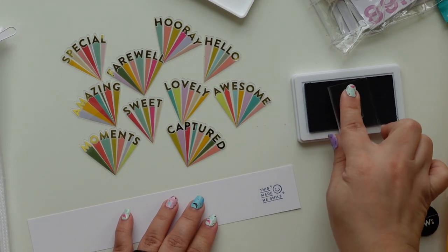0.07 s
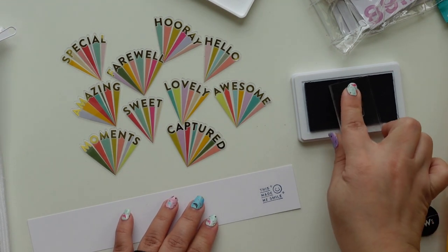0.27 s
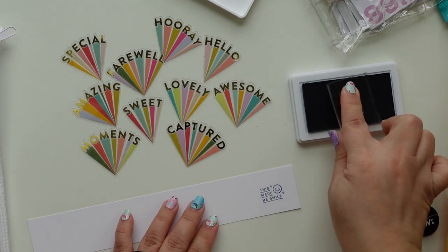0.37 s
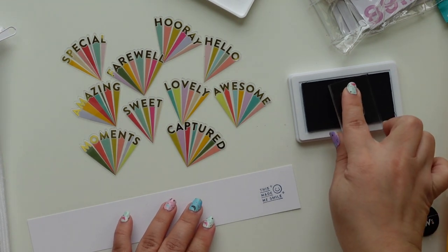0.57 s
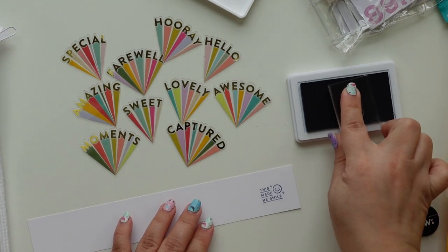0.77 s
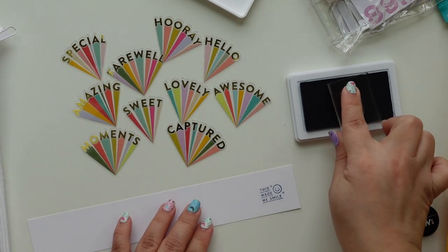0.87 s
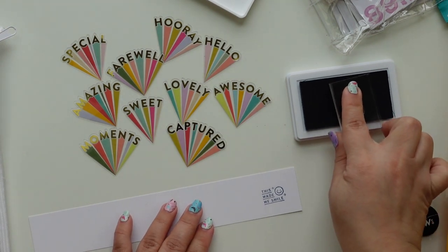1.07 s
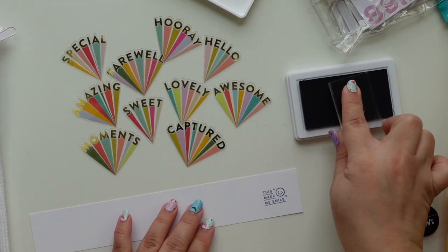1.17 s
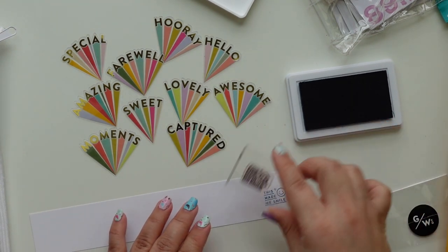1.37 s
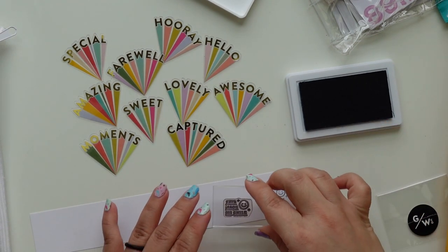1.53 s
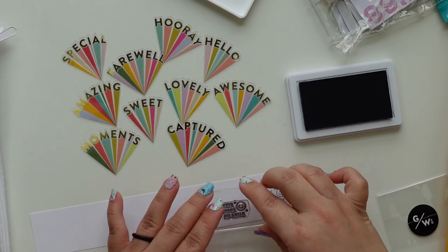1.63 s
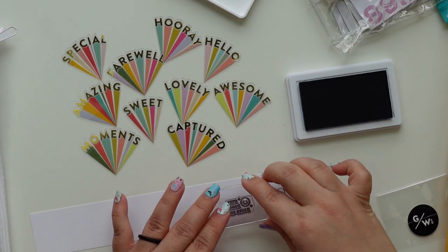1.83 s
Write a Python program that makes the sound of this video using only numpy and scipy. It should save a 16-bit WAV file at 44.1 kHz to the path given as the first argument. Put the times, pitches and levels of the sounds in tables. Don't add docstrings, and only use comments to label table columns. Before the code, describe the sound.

A hard plastic stamp block taps an ink pad on a table, six knocks in steady, slightly quickening succession, the fourth-to-last weak and dull, then near quiet; close stereo microphone in a small room, with faint hiss.

```python
import sys
import numpy as np
from scipy import signal
from scipy.fft import rfft, irfft
from scipy.io import wavfile

SR = 44100
rng = np.random.default_rng(int(sys.argv[2]) if len(sys.argv) > 2 else 0)


def volts(x):
    e = np.asarray(x, float) / 20
    return 10 ** e


def bounce(signal):
    frames = np.transpose(np.atleast_2d(signal))
    limited = np.clip(frames, -1, 1)
    pcm = np.round(limited * 32767).astype(np.int16)
    wavfile.write(sys.argv[1], SR, pcm)


N = 83790


def add(mix, start_s, sound):
    at = round(start_s * SR)
    sound = sound[..., max(-at, 0):]
    part = mix[..., max(at, 0):][..., :sound.shape[-1]]
    part += sound[..., :part.shape[-1]]


def ring(modes, crest_s, t):
    out = 0
    for pitch_hz, level_db, t60_s in modes:
        out = out + volts(level_db - 60 * t / t60_s) * np.cos(2 * np.pi * pitch_hz * (t - crest_s))
    return out


# pitch_hz, level_db, t60_s
TABLE = [(76, -36, .5), (131, -10, .2), (150, -12, .21), (205, -8, .16), (609, -9, .06)]
# pitch_hz, level_db, t60_s
TRAY = [(261, -20, .24), (279, -21, .24), (308, -15, .22), (370, -26, .16), (430, -15, .1),
        (468, -13, .065), (545, -19, .12), (715, -17, .12)]
TABLE_CREST_S, TRAY_CREST_S, SWELL_S = .0091, .0068, .002
PUSH_HZ, PUSH_TURNS, PUSH_SKEW = 262, 1.6, .75
PUSH_START_S, PUSH_DB = .0004, -3


def thump(level_db):
    t = np.arange(round(PUSH_TURNS / PUSH_HZ * SR)) / SR
    shape = np.sin(np.pi * (t * PUSH_HZ / PUSH_TURNS) ** PUSH_SKEW)
    push = -shape * np.sin(2 * np.pi * PUSH_HZ * t)
    t = np.arange(SR // 2) / SR
    out = ring(TABLE, TABLE_CREST_S, t) + ring(TRAY, TRAY_CREST_S, t)
    out = out * np.minimum(t / SWELL_S, 1) ** 2
    add(out, PUSH_START_S, volts(PUSH_DB) * push)
    return volts(level_db) * out


# pitch_hz, level_db
BLOCK = [(1080, -42), (1290, -44), (1550, 8.5), (1790, 8.5), (2000, 4), (2440, 6), (2950, -1.5),
         (3350, -7.5), (3900, -9), (4700, -11.5), (5500, -51), (6600, -13), (8500, -16), (11000, -32)]
# delay_s, level_db
CONTACTS = [(.0007, -23), (.0020, -15), (.0031, -8), (.0041, -3), (.0060, 0), (.0087, -5), (.0112, -8)]
BLOCK_T60_S, BODY_HZ, SOFT_HZ = .0115, 1050, 4800
CHATTER_DB, CHATTER_S = -17, .004
CONTACT_SPREAD_DB, WIDTH = 1.5, .25


def rattle(level_db, hardness_db):
    t = np.arange(1024) / SR
    luck = rng.standard_normal((len(CONTACTS), 2))
    noise = rng.standard_normal((3, 1024))
    chatter = volts(CHATTER_DB) * noise * (t / CHATTER_S) * np.exp(1 - t / CHATTER_S)
    blows = 0.39 * chatter[0]
    for (delay_s, contact_db), (force, timing) in zip(CONTACTS, luck):
        add(blows, delay_s + .0001 * timing, -volts([contact_db + CONTACT_SPREAD_DB * force]))
    body = np.zeros(1024)
    for pitch_hz, mode_db in BLOCK:
        loss_db = 60 * t / BLOCK_T60_S * np.sqrt(pitch_hz / 1500)
        body += volts(mode_db - loss_db) * np.sin(2 * np.pi * pitch_hz * t)
    band = signal.butter(2, [BODY_HZ, SOFT_HZ * volts(hardness_db)], "band", fs=SR, output="sos")
    struck = signal.fftconvolve(blows + WIDTH * chatter[1:], body[None], axes=1)
    return volts(level_db - 14) * signal.sosfilt(band, struck)


def read(points, hz):
    f, value = np.transpose(points)
    return np.interp(np.log(hz + 1), np.log(f + 1), value)


# pitch_hz, t60_s
ROOM = [(100, 0.1), (260, 0.44), (700, 0.58), (1800, 0.39), (4800, 0.67), (12000, 0.45)]
# pitch_hz, likeness (0 to 1)
ROOM_SAME = [(250, .99), (600, .78), (5000, .82)]
ROOM_START_S = .01


def room(x):
    length = SR // 2
    echoes = np.zeros((3, length))
    at = np.arange(0, length - 10, 10) + rng.integers(0, 10, (3, (length - 1) // 10))
    np.put_along_axis(echoes, at, rng.choice([-1., 1.], at.shape), 1)
    hz, t, z = signal.stft(echoes, SR, nperseg=256)
    same = np.clip(read(ROOM_SAME, hz), 0, 1)[:, None]
    z = same * z[0] + np.sqrt(1 - same ** 2) * z[1:]
    z = z * volts(-60 * t / read(ROOM, hz)[:, None])
    tail = signal.istft(z, SR, nperseg=256)[1][:, :length]
    tail = tail * np.minimum(np.arange(length) / SR / ROOM_START_S, 1) ** 2
    return signal.fftconvolve(x[None], tail / np.linalg.norm(tail[0]), axes=1)


# start_s, thump_db, rattle_db, hardness_db
TAPS = [
    (-.040, -30.5, -55, -10),
    (.2170, -27, -21.5, .5),
    (.4185, -25.5, -23.5, 0),
    (.5964, -31, -37, -8),
    (.7627, -26.5, -23.5, 0),
    (.9126, -24.5, -19.5, 1),
    (1.0676, -25.5, -21.5, .5),
]
# delay_s, level_db
ECHOES = [(.0115, -17), (.0245, -12), (.0283, -17), (.0335, -19), (.0445, -21)]
RATTLE_LEAD_S, RIGHT_DB, ECHO_HZ = .0017, 2.6, 3300
ROOM_LOW_DB, ROOM_HIGH_DB = -10.5, -10.5


def taps():
    out = np.zeros((2, N))
    wall = signal.butter(1, ECHO_HZ, fs=SR, output="sos")
    for start_s, thump_db, rattle_db, hardness_db in TAPS:
        low = thump(thump_db)
        high = rattle(rattle_db, hardness_db) * volts([[-RIGHT_DB / 2], [RIGHT_DB / 2]])
        add(out, start_s, low)
        add(out, start_s - RATTLE_LEAD_S, high)
        dull = signal.sosfilt(wall, high)
        for delay_s, level_db in ECHOES:
            add(out, start_s - RATTLE_LEAD_S + delay_s, volts(level_db) * dull)
        feed = volts(ROOM_LOW_DB) * low
        add(feed, 0, volts(ROOM_HIGH_DB) * high.mean(0))
        add(out, start_s, room(feed))
    return out


# start_s, level_db, length_s, pitch_hz
LIFTS = [
    (.358, -54, .04, 312),
    (1.2, -58, .04, 308),
    (.15, -67, .04, 300),
]


def lifts():
    out = np.zeros(N)
    for start_s, level_db, length_s, pitch_hz in LIFTS:
        t = np.arange(0, length_s, 1 / SR)
        swell = np.sin(np.pi * np.sqrt(t / length_s)) ** 2
        add(out, start_s, volts(level_db) * swell * np.sin(2 * np.pi * pitch_hz * t))
    return out


def evened(x):
    return x / np.sqrt(np.mean(x ** 2) + 1e-20)


# pitch_hz, width_hz, left_db, right_db
WHIR = [(844.6, 82, -95, -57), (716, 190, -71, -66), (1183, 170, -74, -65.5), (937, 290, -72, -66.5),
        (1520, 300, -74, -88), (1810, 600, -80, -71), (1865, 245, -71, -67), (2133, 400, -70, -79)]
THROB_HZ, THROB = 12, .2


def whir():
    hz, t = np.fft.rfftfreq(N, 1 / SR), np.arange(N) / SR
    out = np.zeros((2, N))
    for pitch_hz, width_hz, left_db, right_db in WHIR:
        noise = rfft(rng.standard_normal((2, N)))
        band = irfft(noise / (1 + (2 * (hz - pitch_hz) / width_hz) ** 4), N)
        out += volts([[left_db], [right_db]]) * evened(band)
    return out * (1 + THROB * np.sin(2 * np.pi * THROB_HZ * t + 0.41))


# pitch_hz, level_db (dB per Hz)
HISS = [(40, -9), (120, 0), (400, 0), (1400, -3), (2500, -11), (5000, -15), (10000, -20), (15600, -22)]
# pitch_hz, likeness (0 to 1)
SAME = [(60, 0.53), (290, 0.037), (3100, 0.12), (6800, 0.52), (15000, 0.94)]
HISS_DB = -68.5


def hiss():
    hz = np.fft.rfftfreq(N, 1 / SR)
    a, b = rfft(rng.standard_normal((2, N)))
    same = np.clip(read(SAME, hz), -1, 1)
    pair = np.array([a, same * a + np.sqrt(1 - same ** 2) * b])
    return volts(HISS_DB) * evened(irfft(pair * volts(read(HISS, hz)), N))


def scene():
    return taps() + lifts() + whir() + hiss()


def roll_off(x):
    return signal.sosfilt(signal.butter(12, 15660, fs=SR, output="sos"), x)


def record(dry):
    cut = signal.butter(2, 61, "high", fs=SR, output="sos")
    return roll_off(signal.sosfiltfilt(cut, dry))


dry = scene()
out = record(dry)
bounce(out)
```